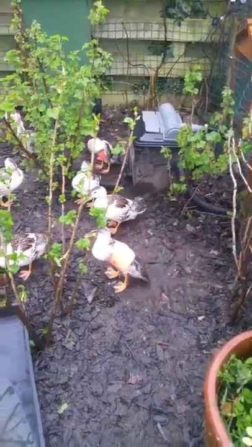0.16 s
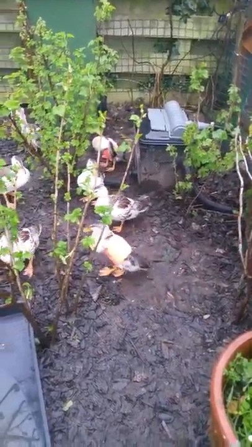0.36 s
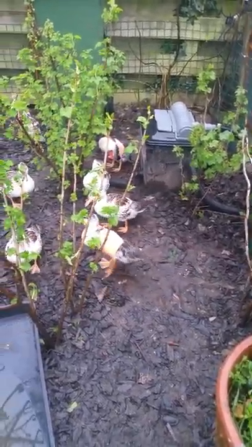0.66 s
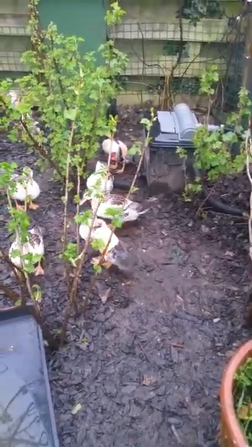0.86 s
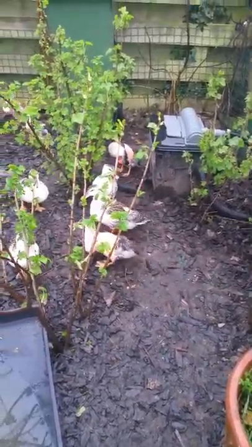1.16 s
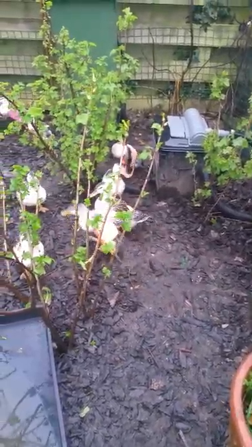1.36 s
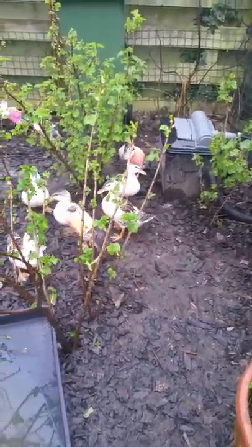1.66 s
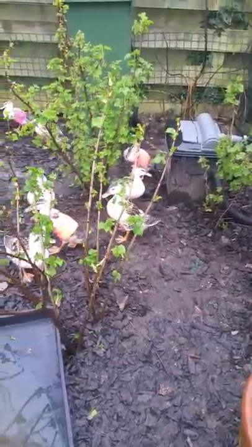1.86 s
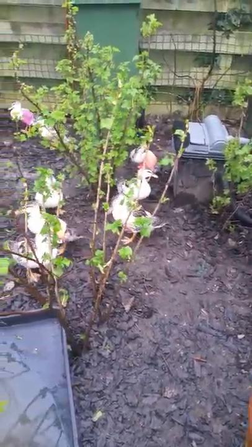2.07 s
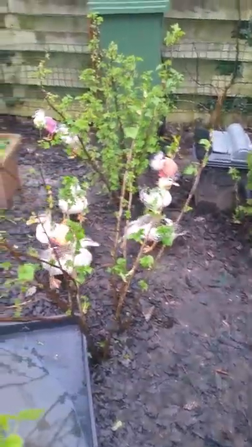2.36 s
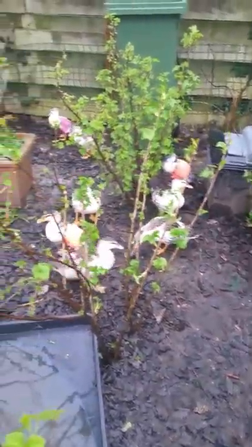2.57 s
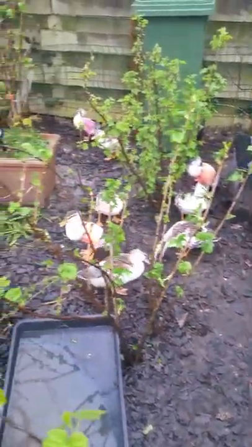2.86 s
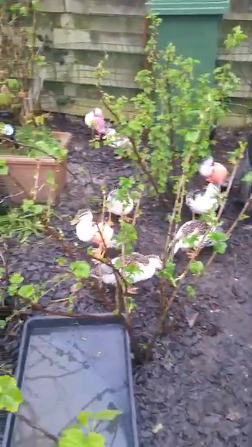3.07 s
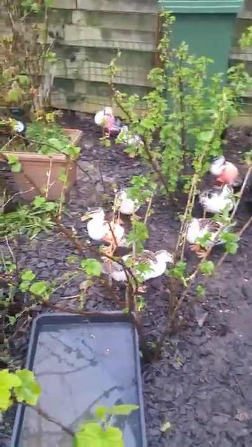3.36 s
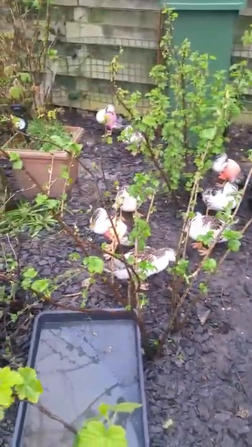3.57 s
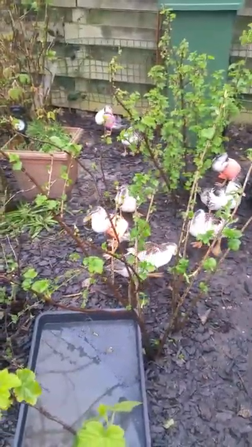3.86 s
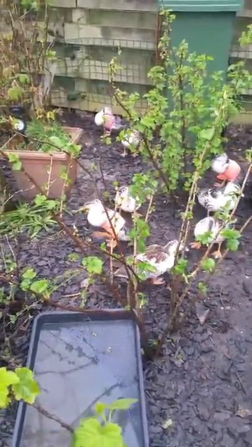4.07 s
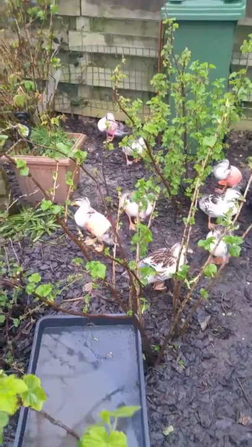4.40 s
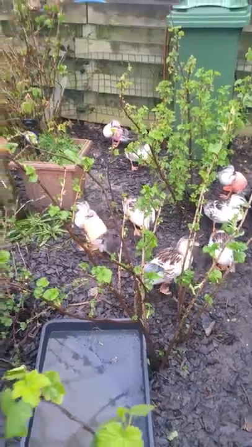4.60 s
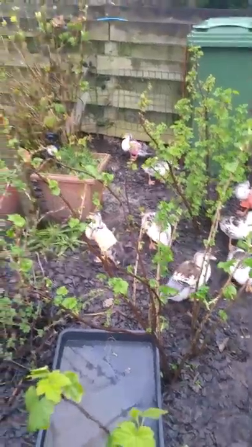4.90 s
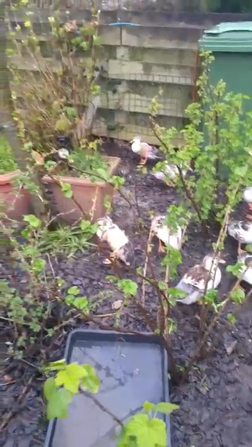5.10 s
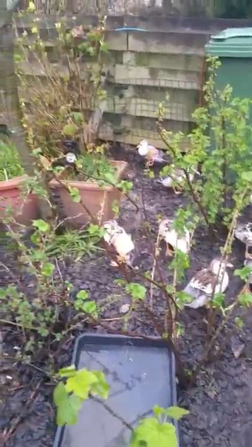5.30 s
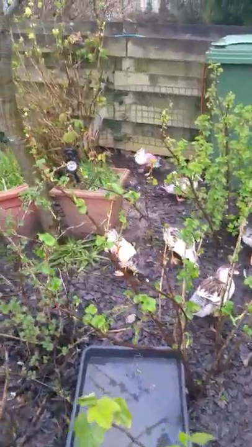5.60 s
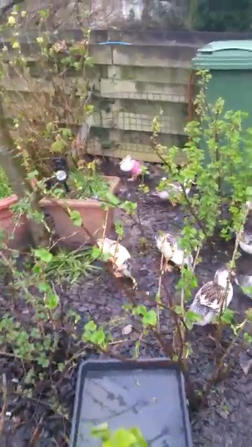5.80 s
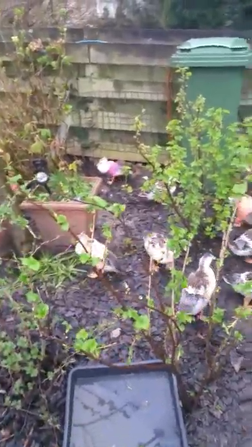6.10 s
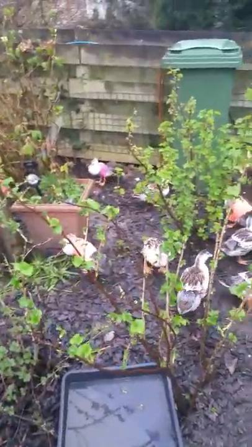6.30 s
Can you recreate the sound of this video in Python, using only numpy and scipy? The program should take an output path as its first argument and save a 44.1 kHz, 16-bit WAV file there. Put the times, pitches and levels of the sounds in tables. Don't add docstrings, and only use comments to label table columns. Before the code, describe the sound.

Outdoors in a fenced garden, a small group of young ducks calls in short, overlapping notes. A full-voiced one peeps first, then a hoarse, breathy caller repeats steadily, joined by a clear voice and later a reedy shrill one. Bills and feet tick and smack on wet leaves and stones. A handheld stereo microphone catches soft garden noise and low wind thumps, strongest at the start and around the middle.

```python
import sys
import numpy as np
from scipy import signal
from scipy.fft import rfft, irfft, next_fast_len
from scipy.io import wavfile
from scipy.ndimage import uniform_filter1d

SR = 44100
rng = np.random.default_rng(int(sys.argv[2]) if len(sys.argv) > 2 else 0)


def natural_amplitude(level_db):
    exponent = np.asarray(level_db, float) / 20
    return 10 ** exponent


def to_wav(s):
    ch = np.atleast_2d(s).T
    pcm = np.round(np.clip(ch, -1, 1) * 32767)
    wavfile.write(sys.argv[1], SR, pcm.astype(np.int16))


N = 284356
T = np.arange(N) / SR
PADDED = next_fast_len(N)


def rms_one(x):
    return x / np.sqrt(np.mean(np.abs(x) ** 2) + 1e-20)


def at_hz(points, hz):
    table_hz, values = np.transpose(points)
    return np.interp(np.log(hz), np.log(table_hz), values)


def drift(rate_hz):
    step = max(1, int(SR / rate_hz / 40))
    r = np.exp(-2 * np.pi * rate_hz * step / SR)
    white = rng.standard_normal(N // step + 402)
    slow = signal.lfilter([1], [1, -2 * r, r * r], white)[400:]
    return np.interp(np.arange(N) / step, np.arange(len(slow)), rms_one(slow))


def complex_drift(rate_hz):
    return drift(rate_hz) + 1j * drift(rate_hz)


def resonance(x, hz, width_hz):
    r = np.exp(-np.pi * width_hz / SR)
    top = np.array([1, 0, -1]) * (1 - r * r) / 2
    return signal.lfilter(top, [1, -2 * r * np.cos(2 * np.pi * hz / SR), r * r], x)


# pitch_hz, likeness (0 to 1)
LIKENESS = [(60, 0.82), (180, 1), (550, 0.82), (1650, 0.014), (4970, 0.0067), (15000, 0.01)]


def banded_noise(spectrum, flicker_db, flicker_hz, alike_share):
    out = 0
    edges = 20 * 2 ** np.arange(0, 9.7, .5)
    white = rng.standard_normal((2, 2, N))
    for k, (low, high) in enumerate(zip(edges, edges[1:])):
        hz = np.sqrt(low * high)
        if not spectrum[0][0] < hz < spectrum[-1][0]:
            continue
        band = signal.butter(2, [low, high], "band", fs=SR, output="sos")
        mid, side = signal.sosfilt(band, white[k % 2])
        alike = np.clip(alike_share * at_hz(LIKENESS, hz), -1, 1)
        gain = natural_amplitude(at_hz(spectrum, hz) + flicker_db * drift(flicker_hz))
        out = out + gain * (np.sqrt(1 + alike) * mid + np.sqrt(1 - alike) * side * [[1], [-1]])
    return rms_one(out)


def town_hum():
    return natural_amplitude(-61) * rms_one(resonance(rng.standard_normal((2, N)), 100, 12))


# pitch_hz, level_db (per Hz)
GARDEN = [(15, -9), (25, -8.5), (72, -1), (149, -11), (589, -5), (731, -8), (793, -3.5), (1400, -7.5),
          (2040, -11.5), (2820, -15.5), (5550, -26), (10600, -32.5), (15900, -28.5)]


def garden_floor():
    return natural_amplitude(-49.5) * banded_noise(GARDEN, flicker_db=1.8, flicker_hz=8.7, alike_share=1.0)


# peak_s, level_db, length_s
GUSTS = [(0.0, -25.5, 0.055), (0.223, -40.5, 0.37), (1.61, -44, 0.06), (2.424, -37, 0.086),
         (2.768, -25.5, 0.047), (2.821, -26.5, 0.082), (2.926, -30, 0.067), (3.057, -32, 0.057),
         (3.154, -31, .08), (3.351, -28, 0.059), (3.794, -33, 0.12), (3.874, -30.5, 0.091),
         (3.978, -36, 0.063), (4.155, -32.5, .15), (4.252, -39, 0.044), (4.366, -37.5, 0.13),
         (4.569, -38, 0.053), (4.629, -27.5, 0.038), (4.693, -41, 0.17), (4.821, -39.5, 0.085),
         (5.263, -42.5, 0.13), (5.458, -44.5, 0.066)]
GUST_RISE_DB, GUST_FALL_DB = 30.5, 20
# time_s, level_db
BREEZE = [(0.0, -39.5), (.5, -51.5), (2.3, -62), (2.7, -47.5), (3.5, -46), (4.45, -56), (5.1, -60),
          (5.55, -69), (6.45, -71)]
# pitch_hz, level_db (per Hz)
BUFFET = [(12, -40), (20, -15), (65, 1), (112, 0.5), (204, -9), (328, -21.5), (612, -44.5), (700, -52),
          (910, -60), (1540, -120)]
# time_s, left_minus_right_db
WINDWARD = [(0.0, 2.5), (4.78, 15.5), (6.45, 12)]


def wind():
    gusts = 0
    for s, db, length in GUSTS:
        lost_db = np.maximum(GUST_RISE_DB * (s - T), GUST_FALL_DB * (T - s)) / length
        gusts = gusts + natural_amplitude(db - lost_db) ** 2
    breeze = natural_amplitude(np.interp(T, *np.transpose(BREEZE)))
    force = np.sqrt(gusts + breeze ** 2)
    lumps = natural_amplitude(3.2 * np.array([drift(20), drift(17)]))
    noise = banded_noise(BUFFET, flicker_db=2.5, flicker_hz=43.93, alike_share=0)
    pan_db = np.interp(T, *np.transpose(WINDWARD))
    return rms_one(lumps * noise) * force * natural_amplitude(2.5 + np.array([pan_db, -pan_db]) / 2)


# start_s, end_s, pitch_hz, level_db
INSECT = [
    (0.265, 0.356, 11400, -81),
    (1.857, 1.95, 10900, -80),
    (2.065, 2.3, 11000, -84),
    (3.262, 3.416, 11300, -88),
    (4.0, 4.098, 11000, -84),
    (6.27, 6.39, 11000, -77),
]


def insect():
    air = rng.standard_normal(N)
    out = 0
    for start, end, hz, db in INSECT:
        fade = np.interp(T, [start - .02, start, end, end + .02], [0, 1, 1, 0])
        out = out + natural_amplitude(db) * rms_one(resonance(resonance(air, hz, 140), hz, 140)) * fade
    return out


# time_s, peak_db
SNAPS = [(0.1474, -54), (0.166, -55), (0.2603, -46), (0.2917, -52), (0.3232, -53), (0.5317, -45),
         (0.6714, -51), (0.6903, -58), (0.7347, -58), (0.7687, -47), (1.3957, -58), (1.4556, -55),
         (1.5748, -46), (1.7868, -53), (2.0188, -38), (2.0457, -51), (2.0734, -56), (2.1271, -50),
         (2.1954, -52), (2.2852, -49), (2.3004, -58), (2.3186, -54), (2.4009, -58), (2.4713, -46),
         (2.609, -55), (2.6274, -59), (2.8963, -51), (2.9352, -54), (3.4206, -48), (4.0956, -48),
         (4.5221, -50), (4.9107, -51), (5.7463, -48), (6.1365, -51)]


def snaps():
    out = np.zeros((2, N + SR))
    t = np.arange(SR // 50) / SR
    cracks = rng.standard_normal((len(SNAPS), 2, len(t))) * natural_amplitude(-60 * t / .008)
    for (s, db), crack in zip(SNAPS, cracks):
        out[:, round(s * SR):][:, :len(t)] += natural_amplitude(db - 1) * crack
    treble = signal.butter(2, [5000, 13500], "band", fs=SR, output="sos")
    return signal.sosfilt(treble, out[:, :N] + 1e-18)


# time_s, peak_db, ring_hz, bright_edge_db, left_minus_right_db
TICKS = [(0.195, -49, 875, 11, 0), (0.665, -54, 1150, 12, 6), (1.152, -23, 3680, 11.5, 0),
         (1.153, -24, 1690, -4, 4), (1.337, -23, 900, -8, 3), (1.337, -27.5, 3030, -19, 5),
         (1.64, -45, 954, 1, 10), (2.194, -48, 780, -20, 7), (2.425, -44, 2040, 8, -4),
         (3.386, -56, 759, 12, 11), (3.769, -47, 1600, -26, 14), (4.029, -54.5, 864, 15.5, 5),
         (4.697, -37, 1300, -30, -5), (4.839, -50, 880, 5, 8), (5.721, -48, 970, 8, -7),
         (5.748, -24, 945, -31, 10), (5.78, -34.5, 980, -1, 5), (5.8, -38.5, 1190, 3.5, 6),
         (6.15, -43, 780, -32, 9), (6.157, -35, 4600, -21, 2)]
CONTACT_S, SOFTENING = .0003, .42
KNOCK_HZ = 1000


def ticks():
    out = np.zeros((2, N + SR))
    t = np.arange(SR // 10) / SR
    grit = rng.standard_normal((len(TICKS), 2, len(t))) * (1 + 2.53 * np.exp(-t / 0.0052))
    bright = signal.butter(2, [3500, 13500], "band", fs=SR, output="sos")
    for (s, db, hz, bright_db, pan_db), (body, edge) in zip(TICKS, grit):
        rough_ring = rms_one(resonance(resonance(body, hz, 0.2 * hz), hz, hz))
        ring = 0.31 * np.sin(2 * np.pi * hz * t) + 0.3 * rough_ring
        thud = rms_one(resonance(resonance(edge[::-1] + body, 0.6 * hz, 0.7 * hz), hz, hz))
        knock = 0.35 * min(1, KNOCK_HZ / hz) * thud
        crackle = natural_amplitude(bright_db - 19) * signal.sosfilt(bright, edge) * natural_amplitude(-60 * t / 0.1)
        landing = (1 - np.exp(-t / (CONTACT_S * natural_amplitude(-SOFTENING * bright_db)))) ** 2
        hit = natural_amplitude(db - 2) * ((ring + knock) * landing * natural_amplitude(-60 * t / 0.023) + crackle)
        out[:, round(s * SR):][:, :len(t)] += hit * natural_amplitude([[pan_db / 2], [-pan_db / 2]])
    return out[:, :N]


def calls(tables, fade_s):
    s, *columns = np.vstack(tables).T
    gate = np.zeros(N)
    for table in tables:
        start, end = table[0][0], table[-1][0]
        near = slice(max(0, int((start - fade_s) * SR)), int((end + fade_s) * SR))
        gate[near] += np.interp(T[near], [start - fade_s, start, end, end + fade_s], [0, 1, 1, 0])
    smooth = [uniform_filter1d(np.interp(T, s, c), size=200) for c in columns]
    return *smooth, np.minimum(gate, 1)


def notes(*voices):
    tables = []
    for rows, shape in voices:
        for s, length, low_hz, top_hz, db in rows:
            tables.append([(s + at * length, (low_hz + climb * (top_hz - low_hz)) * bend, db + shape_db)
                           for at, climb, bend, shape_db in shape])
    return sorted(tables)


def membrane(tables, rough, skirt_hz, overtones_db):
    hz, db, gate = calls(tables, fade_s=0.0043)
    level = np.sqrt(2) * natural_amplitude(db) * gate
    turn = np.exp(2j * np.pi * np.cumsum(hz * (1 + .006 * drift(40))) / SR)
    skirt = (1 + rough * complex_drift(skirt_hz)) / np.sqrt(1 + 2 * rough ** 2)
    grain = 1 + .45 * complex_drift(110)
    overtones = sum(natural_amplitude(o_db) * turn ** (k + 1) for k, o_db in enumerate(overtones_db))
    effort = natural_amplitude(.7 * (db + 40)) * np.minimum(1, (2200 / hz) ** 14)
    voice = level * skirt * turn * (1 + effort * grain * overtones)
    return voice, turn * (3 + grain) / 4, level


def syrinx(low, high, rough, skirt_hz, low_db, high_db, mixing_db):
    a, a_turn, a_level = membrane(low, rough, skirt_hz, low_db)
    b, b_turn, b_level = membrane(high, rough, skirt_hz, high_db)
    beat = b_turn / a_turn
    offsets = beat + 1 / beat + 0.75 * beat * beat
    mixed = sum(natural_amplitude(db) * a_turn ** (k + 2) * offsets for k, db in enumerate(mixing_db))
    return np.real(a + b + np.sqrt(a_level * b_level) * mixed)


def placed(x, pan_db, lag_s):
    turn = np.exp(1j * np.pi * np.fft.rfftfreq(PADDED, 1 / SR) * lag_s)
    shifted = irfft(rfft(x, PADDED) * [turn, turn.conj()], PADDED)[:, :N]
    return shifted * natural_amplitude([[pan_db / 2], [-pan_db / 2]])


CLEAR, REEDY, HOARSE, WET = .2, .25, .35, .9
# share_of_length, share_of_climb, pitch_factor, level_db
DROP = [(0, 0, 1.0, -12), (.33, .25, 1.0, 0), (1, 1, 1.0, -12)]
# start_s, length_s, from_hz, to_hz, level_db
SMACKS = [
    (4.681, 0.0092, 4456, 4060, -32),
    (4.691, 0.0096, 2156, 1920, -25),
    (4.838, 0.01, 3900, 3600, -49),
    (6.153, 0.01165, 3030, 2850, -40.5),
    (6.168, 0.016, 1934, 1710, -42),
]


def smacks():
    return membrane(notes((SMACKS, DROP)), WET, skirt_hz=447, overtones_db=[-26])[0].real


# share_of_length, share_of_climb, pitch_factor, level_db
ARCH = [(0, 0.056, 1, -4), (.55, 0.99, 0.96, -0.5), (.8, 0.92, 0.99, 0.5), (1.001, 0.99, 0.89, -21)]
# start_s, length_s, from_hz, to_hz, level_db
FAR_CALL = [
    (.56, .11, 3360, 2950, -61.5),
]


def far_duckling():
    return membrane(notes((FAR_CALL, ARCH)), HOARSE, skirt_hz=100, overtones_db=[-30])[0].real


# share_of_length, share_of_climb, pitch_factor, level_db
DIVE = [(0, 0, 1.4, -17), (.09, 0, 1.1, -7), (.2, 0, 1.0, -3), (.55, .7, 1.0, -1.5), (.88, 1, 1.0, 0),
        (1, 1, .84, -12)]
# start_s, length_s, from_hz, to_hz, level_db
MELLOW_LOW = [
    (1.168, 0.068, 1843, 2037, -38.5),
    (1.905, .12, 1538, 1843, -42.5),
]
# start_s, length_s, from_hz, to_hz, level_db
MELLOW_HIGH = [
    (1.95, 0.074, 1926, 2140, -46),
]
# start_s, length_s, from_hz, to_hz, level_db
MELLOW_SWELL = [
    (1.203, 0.039, 2193, 2094, -30.5),
]


def mellow_duck():
    low = notes((MELLOW_LOW, DIVE))
    high = notes((MELLOW_HIGH, ARCH), (MELLOW_SWELL, DROP))
    return syrinx(low, high, CLEAR, skirt_hz=120, low_db=[-17, -23], high_db=[-30], mixing_db=[-26, -30])


# start_s, length_s, from_hz, to_hz, level_db
SHRILL_LOW = [
    (2.852, 0.11, 1730, 1830, -42.5),
    (3.192, 0.099, 1780, 1919, -38.5),
    (3.615, .12, 1720, 1929, -38.5),
    (3.905, 0.081, 1832, 1921, -33),
]
# start_s, length_s, from_hz, to_hz, level_db
SHRILL_HIGH = [
    (2.89, 0.043, 1917, 2064, -44),
    (3.23, 0.062, 2008, 2246, -38),
    (3.655, 0.0674, 2037, 2213, -38.5),
    (3.945, 0.055, 2150, 2245, -35.5),
]


def shrill_duck():
    return syrinx(notes((SHRILL_LOW, DIVE)), notes((SHRILL_HIGH, ARCH)), REEDY, skirt_hz=140,
                  low_db=[-14, -18.5, -33, -49, -53], high_db=[-16, -34], mixing_db=[-28])


# share_of_length, share_of_climb, pitch_factor, level_db
DROOP = [(0, 0.019, 1.03, -8.5), (0.2, 0.031, 1.0, -2.5), (0.681, 1, 1.0, -1), (0.779, 0.99, .97, -4),
         (0.998, 0.89, .67, -8)]
# start_s, length_s, from_hz, to_hz, level_db
DEEP_LOW = [
    (0.0, 0.11, 1471, 1690, -33.5),
    (.42, 0.1, 1551, 1728, -30.5),
    (.826, .1, 1555, 1697, -31.5),
]
# start_s, length_s, from_hz, to_hz, level_db
DEEP_CHEEP = [
    (.323, 0.034, 1588, 1640, -40.5),
]
# start_s, length_s, from_hz, to_hz, level_db
DEEP_HIGH = [(0.0, 0.043, 1798, 2036, -48), (.06, 0.031, 2205, 2274, -39), (.102, .035, 1946, 2030, -50.5),
             (.352, 0.063, 1860, 1990, -44.5), (.43, 0.032, 2390, 2410, -37),
             (.472, 0.037, 2063, 2290, -34), (.858, .06, 2058, 2312, -35)]
# start_s, length_s, from_hz, to_hz, level_db
DEEP_SQUEAK = [
    (.305, 0.023, 2200, 1868, -47.5),
    (.405, 0.02, 2650, 2072, -35),
    (.824, 0.037, 2448, 1971, -34),
    (2.53, 0.0193, 2530, 1743, -39.5),
]


def deep_duck():
    low = notes((DEEP_LOW, DROOP), (DEEP_CHEEP, ARCH))
    high = notes((DEEP_HIGH, ARCH), (DEEP_SQUEAK, DROP))
    return syrinx(low, high, CLEAR, skirt_hz=120, low_db=[-23, -28, -30, -36], high_db=[-28, -36],
                  mixing_db=[-22, -24, -29, -32, -35])


# start_s, length_s, peak_share, throat_rasp_db, bill_hiss_db
RASP = [(.03, 0.074, 0.37, -40, -66), (.42, 0.089, 0.31, -40, -65), (.525, 0.027, 0.25, -54, -71),
        (.825, .125, .35, -42, -59), (1.235, 0.051, 0.32, -42.5, -74), (1.455, 0.11, 0.73, -44.5, -67.5),
        (1.77, 0.12, 0.58, -42.5, -68), (2.09, 0.1, 0.76, -42.5, -69), (2.41, 0.1, 0.84, -41, -66.5),
        (2.76, 0.12, 0.51, -42.5, -67.5), (3.095, 0.12, 0.59, -40.5, -66.5), (3.21, 0.082, 0.32, -53, -71),
        (3.44, 0.091, 0.72, -41, -65), (3.63, 0.1, 0.54, -52, -70), (3.8, 0.11, 0.6, -42.5, -65),
        (3.91, .09, 0.6, -46, -68.5), (4.245, 0.097, 0.69, -43.5, -70), (4.575, .09, 0.67, -43, -69),
        (4.679, 0.023, 0.34, -47, -56), (4.905, 0.098, 0.66, -46, -69), (5.275, 0.094, 0.48, -44.5, -64),
        (5.62, 0.099, 0.59, -48, -69), (5.95, 0.092, 0.65, -45, -67)]
THROAT_SWELL_DB = [-13, -2, -0.5, -11]
BILL_SWELL_DB = [-13.5, -0.5, 3.5, -6]


def puffs():
    tables = []
    for s, length, peak, throat_db, bill_db in RASP:
        swell = zip([0, peak / 2, peak, 1], THROAT_SWELL_DB, BILL_SWELL_DB)
        tables.append([(s + at * length, throat_db + a, bill_db + b) for at, a, b in swell])
    return tables


# pitch_hz, half_width_hz, level_db
THROAT = [(1686, 107, -10.5), (2248, 370, 8), (2670, 200, 1), (3100, 95, 0)]
# pitch_hz, level_db (per Hz)
BILL = [(1940, -10), (3300, -8), (3800, -6), (4300, 0), (4900, -7), (5600, 1), (6100, -9), (6600, -20),
        (7400, -12), (8050, -3), (8900, -11), (10200, -8), (11300, -17), (15800, -33)]


def rasp():
    throat_db, bill_db, gate = calls(puffs(), fade_s=.012)
    flutter = natural_amplitude(1.9 * drift(200))
    since_s = T - np.maximum.accumulate(np.where(gate > 0, 0, T))
    opening = 1 - .5 * np.exp(-since_s / .022) + .03 * drift(12)
    turns = 2j * np.pi * np.cumsum(opening) / SR
    throat = sum(natural_amplitude(db) * np.real(complex_drift(width) * np.exp(hz * turns)) for hz, width, db in THROAT)
    air = (rng.standard_normal(N) + 1.19 * rng.standard_normal((2, N))) * flutter
    colour = natural_amplitude(at_hz(BILL, np.fft.rfftfreq(PADDED, 1 / SR) + 1))
    bill = irfft(rfft(air, PADDED) * colour, PADDED)[:, :N]
    return gate * (natural_amplitude(throat_db + 0.4) * rms_one(throat * flutter) + natural_amplitude(bill_db + 16) * rms_one(bill))


# share_of_length, share_of_climb, pitch_factor, level_db
SCOOP = [(0, 0.00572, 0.96, -11), (0.281, 0.99, 1, 2.5), (.6, 1, 1.0, -14), (1, 0.98, 0.97, 1.5)]
# share_of_length, share_of_climb, pitch_factor, level_db
BREAK = [(0, 0.14, 1.0, -10.5), (0.222, 0.99, 1.1, -3.5), (.55, 0.98, 1.0, -4), (.85, 1, 1.08, 2),
         (1, 0.86, 1.08, -16)]
# share_of_length, share_of_climb, pitch_factor, level_db
SLIDE = [(0, 0.044, 0.99, -5.5), (.55, .8, 1, 0.5), (1.002, 1, 1.0, -17)]
# start_s, length_s, from_hz, to_hz, level_db
HOARSE_LOW = [(1.77, 0.085, 1376, 1715, -50.5), (2.09, 0.036, 1447, 1800, -47),
              (2.757, 0.071, 1200, 1799, -42), (4.905, 0.069, 1448, 2010, -45.5),
              (5.255, .095, 1407, 1968, -41.5), (5.62, 0.06, 1646, 2060, -46),
              (5.948, 0.059, 1597, 1875, -40)]
# start_s, length_s, from_hz, to_hz, level_db
HOARSE_SLIDE = [
    (3.78, 0.085, 1450, 2150, -44.5),
    (4.248, 0.073, 1691, 2370, -45.5),
    (4.575, .035, 1530, 1800, -46),
]
# start_s, length_s, from_hz, to_hz, level_db
HOARSE_BREAK = [
    (2.41, 0.084, 1387, 2130, -43),
    (3.095, 0.093, 1717, 2126, -41.5),
    (3.44, 0.073, 1360, 2224, -40),
]
# start_s, length_s, from_hz, to_hz, level_db
HOARSE_HIGH = [(1.778, 0.065, 2192, 2896, -46), (1.865, 0.046, 2900, 2147, -45.5),
               (2.1, 0.073, 2210, 3030, -43.5), (2.43, 0.076, 2500, 3250, -51),
               (2.768, 0.063, 2098, 3030, -45.5), (3.115, 0.06, 2550, 3150, -48),
               (3.46, 0.069, 2548, 3100, -48.5), (3.787, 0.057, 2174, 2780, -41.5),
               (4.255, 0.041, 2399, 2830, -48), (4.578, 0.0655, 2180, 2500, -46.5),
               (4.908, 0.064, 2143, 3162, -44.5), (5.265, 0.077, 2380, 2957, -45),
               (5.625, 0.067, 2400, 2910, -46.5), (5.975, 0.049, 2556, 2978, -49)]


def hoarse_duck():
    low = notes((HOARSE_LOW, SCOOP), (HOARSE_SLIDE, ARCH), (HOARSE_BREAK, BREAK))
    high = notes((HOARSE_HIGH, SLIDE))
    voice = syrinx(low, high, HOARSE, skirt_hz=148, low_db=[-20, -24, -26], high_db=[-17, -26],
                   mixing_db=[-24])
    return voice + rasp()


# level_db, t60_s
ECHOES = [
    (-2, 0.13),
    (-2, 0.083),
]


def garden_echoes(x):
    t = np.arange(SR // 4) / SR
    tails = np.array([natural_amplitude(db - 60 * t / t60) * np.sqrt(6 * np.log(10) / t60 / SR) for db, t60 in ECHOES])
    tails = tails * rng.standard_normal(tails.shape) * np.clip(t / 0.00063 - .5, 0, 1)
    dull = signal.lfilter([.5], [1, -.5], x)
    return signal.fftconvolve(dull[None], tails, axes=1)[:, :N]


# pitch_hz, lead_rad
PORT_LEAD = [(0, 0), (3360, 0.3), (5000, -2.4), (8440, -0.8), (12400, -9.9), (13300, -12.4), (14400, -28.4),
             (16100, -44.4)]


def ports(x):
    turn = np.exp(.5j * np.interp(np.fft.rfftfreq(PADDED, 1 / SR), *np.transpose(PORT_LEAD)))
    return irfft(rfft(x, PADDED) * [turn, turn.conj()], PADDED)[:, :N]


DUCK_PAN_DB = [2.5, 5.9, 3.8, 1.3]
DUCK_LAG_S = [.00003, -.00004, .00006, -.00003]


def scene():
    voices = [deep_duck(), mellow_duck(), shrill_duck(), hoarse_duck()]
    ducks = sum(map(placed, voices, DUCK_PAN_DB, DUCK_LAG_S))
    near = ducks + smacks() + far_duckling() + ticks() + insect() + snaps()
    background = wind() + garden_floor() + town_hum()
    return ports(near) + garden_echoes(near.mean(axis=0)) + background


def low_pass(x):
    return signal.sosfilt(signal.butter(12, 15830, fs=SR, output="sos"), x)


def record(dry):
    steep = signal.ellip(10, .5, 70, 16000, fs=SR, output="sos")
    mix = signal.sosfilt(steep, dry)
    return low_pass(mix)


dry = scene()
out = record(dry)
to_wav(out)
```